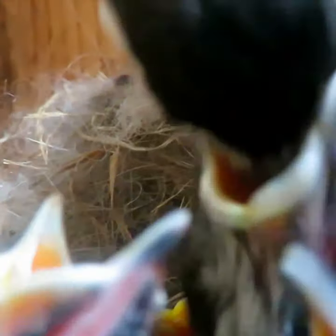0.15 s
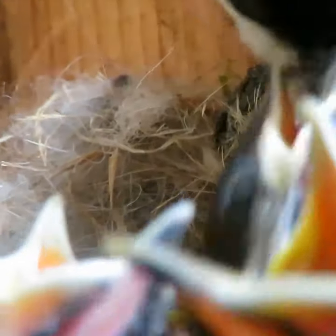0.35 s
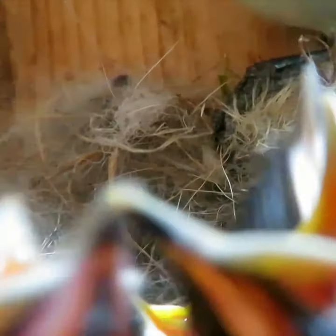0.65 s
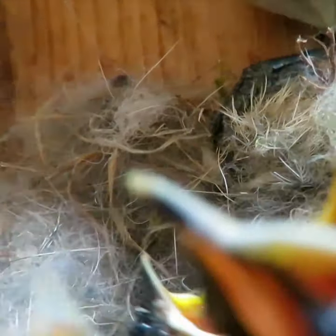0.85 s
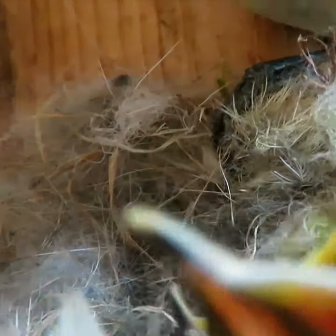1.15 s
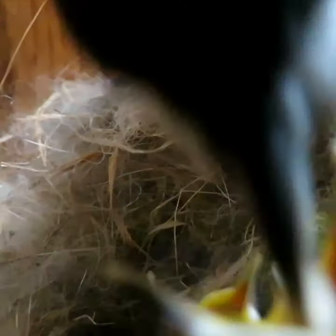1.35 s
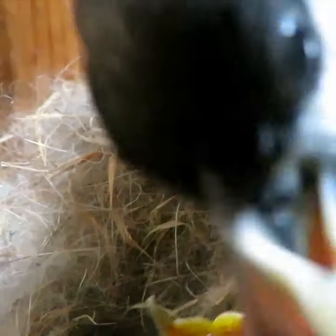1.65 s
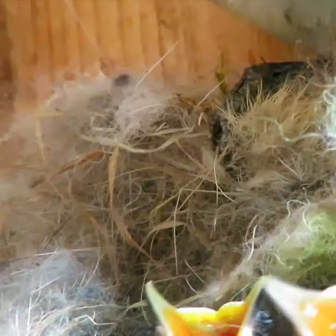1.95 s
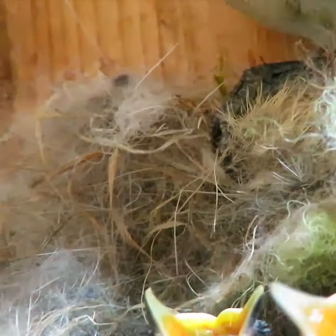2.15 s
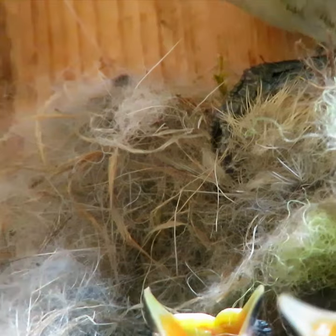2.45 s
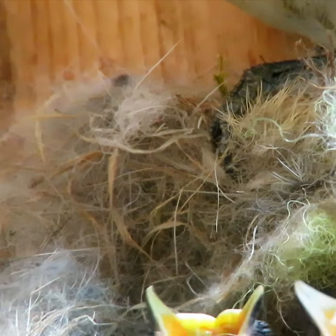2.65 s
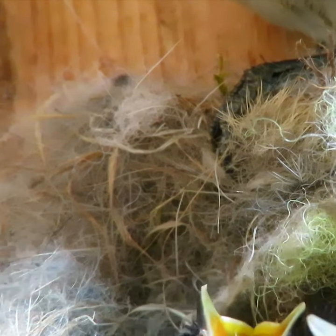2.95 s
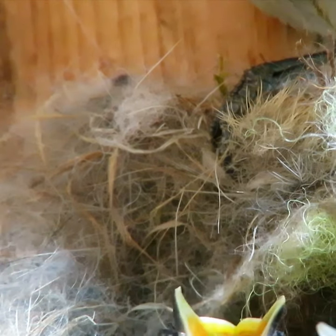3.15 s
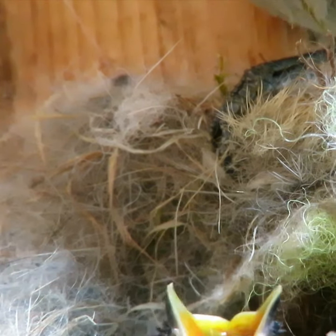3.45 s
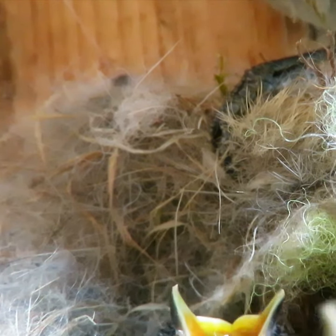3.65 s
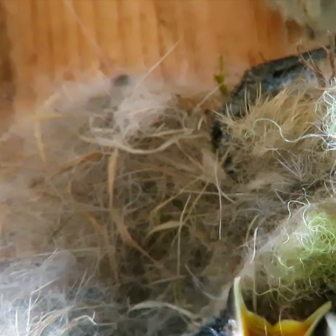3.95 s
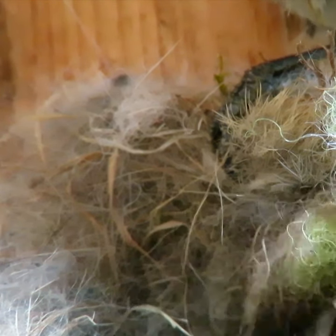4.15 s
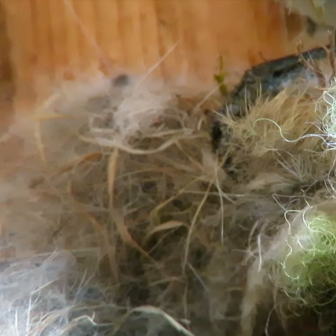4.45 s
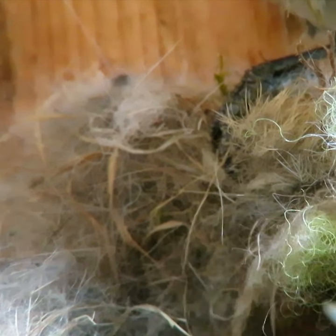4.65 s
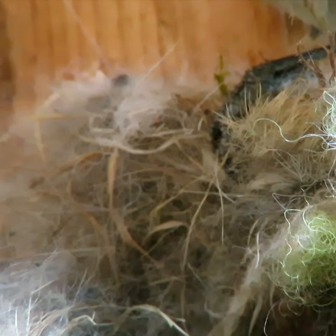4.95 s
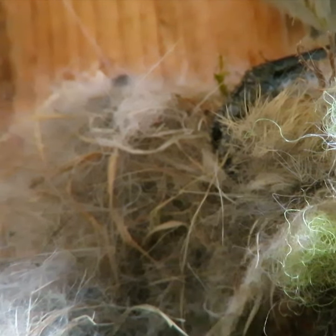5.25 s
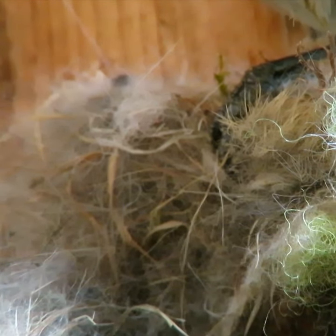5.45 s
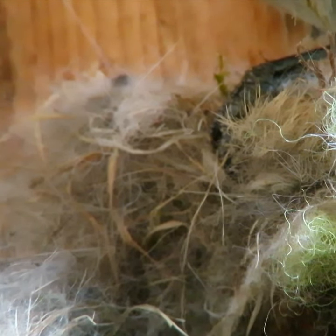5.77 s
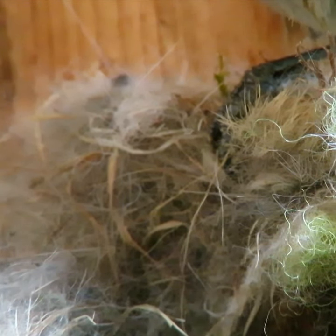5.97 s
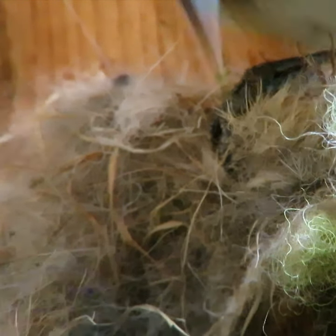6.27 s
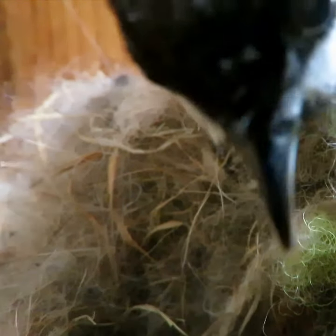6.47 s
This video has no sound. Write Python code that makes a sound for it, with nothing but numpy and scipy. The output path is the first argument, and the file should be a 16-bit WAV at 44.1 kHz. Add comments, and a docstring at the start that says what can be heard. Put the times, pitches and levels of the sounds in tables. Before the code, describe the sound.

Close up in a wooden nest box, baby birds call for food without a break, several throats overlapping in shrill squeals, raspy cheeps and thin sliding whistles. Early on, a parent's foot bumps the wall once, softly. The lower rasping calls grow stronger after that, and the chicks keep going throughout. The box gives the calls a tight, enclosed tone, with faint outdoor rumble, hum and microphone hiss underneath.

```python
"""Outdoor rumble, a faint hum and microphone hiss lie below from start to end.
At once nestlings beg in a small wooden nest box, several throats together: hoarse whistles that swell
and break off, soon joined by thin, clear glides. The box colours the calls, and they reach two close
microphone ports by different paths. At about 1.4 s a parent's foot knocks once on the wood.
The begging goes on to the end, at 6.6 s."""
import sys
import numpy as np
from scipy import signal
from scipy.fft import rfft, irfft, next_fast_len
from scipy.io import wavfile

SR = 44100
rng = np.random.default_rng(int(sys.argv[2]) if len(sys.argv) > 2 else 0)


def to_wav(sig):
    """Store sig (one row per channel, or 1-D mono) as 16-bit WAV at the path in sys.argv[1].

    Samples outside -1..1 are clipped; the rate is SR.
    """
    pcm = np.clip(np.atleast_2d(sig), -1, 1) * 32767
    pcm = np.round(pcm).astype(np.int16)
    wavfile.write(sys.argv[1], SR, pcm.T)  # frames by channels


N = 291501


def amp(db):
    """Turns decibels into a number to multiply by."""
    return 10 ** (np.asarray(db) / 20)


def rms_one(x):
    """Scales a signal so that its average size (rms) is 1."""
    return x / np.sqrt(np.mean(x ** 2) + 1e-20)


def at_hz(points, hz):
    """Reads between the rows of a table, on a log-frequency axis."""
    table = np.array(points, float)
    return np.interp(np.log(hz + 1), np.log(table[:, 0] + 1), table[:, 1])


def drift(rate_hz):
    """A smooth random wander of size 1; a higher rate wanders faster."""
    r = np.exp(-2 * np.pi * rate_hz / SR)
    return rms_one(signal.lfilter([1], [1, -2 * r, r * r], rng.standard_normal(N)))


def shaped(x, response):
    """Multiplies each frequency in x by response(frequency)."""
    size = next_fast_len(N + SR // 4)
    hz = np.arange(size // 2 + 1) * SR / size
    return irfft(rfft(x, size) * response(hz), size)[..., :N]


def ring(push, hz, ring_s):
    """Rings at one pitch when pushed, fading by 60 dB in ring_s seconds."""
    r = amp(-60 / (ring_s * SR))
    return signal.lfilter([1], [1, -2 * r * np.cos(2 * np.pi * hz / SR), r * r], push)


# How strong the rumble's frequencies are against each other: f/Hz, level/dB
RUMBLE_COLOUR = [(15, -41), (25, -12.5), (55, 1), (114, -5), (275, -6.5), (345, 5), (619, -18),
                 (900, -18.5), (1170, -16.5), (1980, -120)]

def rumble(level_db=-41.5, side_db=-15):
    """Low outdoor noise, nearly alike at both microphone ports."""
    mid, side = shaped(rng.standard_normal((2, N)), lambda hz: amp(at_hz(RUMBLE_COLOUR, hz)))
    side = signal.lfilter(*signal.butter(1, 1200, "high", fs=SR), side)
    return amp(level_db) * (rms_one(mid) + amp(side_db) * rms_one(side) * [[1], [-1]])


# The tones of the hum: f/Hz, width/Hz, level/dB
HUM_TONES = [(119.3, 4.5, -50), (236.4, 2.3, -52), (350, 20, -57.5)]

def hum():
    """Narrow bands of noise, heard as low wavering tones."""
    out = np.zeros(N)
    for hz, width_hz, level_db in HUM_TONES:
        ring_s = np.log(1000) / (np.pi * width_hz)
        out += amp(level_db) * rms_one(ring(rng.standard_normal(N), hz, ring_s))
    return out


def hiss(level_db=-60):
    """The microphone's own even noise, separate on each side."""
    return amp(level_db) * rng.standard_normal((2, N))


# How far a squeal sinks (below zero it rises): f/Hz, share of the pitch lost
SQUEAL_SAG = [(3200, -0.0394), (4200, -0.00024), (8500, .015)]

def squeal(start, end, hz, level_db, hoarse, rasp_db, drop=.036):
    """Plans one squeal: the lowest tend to rise, the highest to sink, each a little differently."""
    sag_hz = hz * (at_hz(SQUEAL_SAG, hz) + .012 * rng.standard_normal())
    return start, end, hz + sag_hz / 2, hz - sag_hz / 2, level_db, hoarse, rasp_db, drop, 1


# The squeals that stand out: start t/s, end t/s, f/Hz, level/dB
CLEAR_SQUEALS = [(-0.004, 0.131, 6660, -23), (0.14, 0.35, 6750, -21), (0.453, 0.56, 7250, -27),
                 (0.487, 0.657, 6710, -19.5), (0.687, 0.909, 6950, -26.5), (0.758, 0.945, 7820, -25),
                 (0.94, 1.055, 7150, -22), (1.126, 1.233, 8160, -26), (1.235, 1.37, 6320, -23),
                 (1.454, 1.575, 7400, -25), (1.524, 1.584, 3740, -23), (1.719, 1.892, 6970, -31),
                 (1.866, 1.992, 9000, -25.5), (2.03, 2.065, 3570, -23), (2.04, 2.16, 8740, -22.5),
                 (2.215, 2.365, 8560, -23.5), (2.43, 2.554, 7900, -23.5), (2.592, 2.707, 8400, -21.5),
                 (2.744, 2.937, 7830, -26.5), (2.918, 2.931, 4100, -14.5), (2.975, 3.093, 6650, -22),
                 (3.12, 3.144, 4160, -19.5), (3.169, 3.291, 7580, -22.5), (3.374, 3.507, 7290, -22.5),
                 (3.55, 3.651, 7940, -23), (3.587, 3.634, 3580, -18), (3.656, 3.883, 6740, -20.5),
                 (3.773, 3.804, 3310, -16), (3.863, 3.903, 4020, -17), (3.9, 3.985, 7250, -23),
                 (4.035, 4.115, 7800, -25), (4.143, 4.275, 7350, -22.5), (4.372, 4.46, 6870, -27.5),
                 (4.533, 4.638, 8230, -26.5), (4.676, 4.833, 8800, -31.5), (4.704, 4.803, 6640, -23),
                 (4.887, 4.958, 3200, -21), (4.894, 4.974, 6670, -21), (4.936, 4.996, 4166, -13),
                 (5.056, 5.173, 3146, -23.5), (5.06, 5.193, 5890, -21), (5.105, 5.13, 4055, -14),
                 (5.16, 5.2, 4010, -16), (5.338, 5.41, 3580, -24.5), (5.343, 5.425, 4170, -19.5),
                 (5.47, 5.605, 7300, -30), (5.615, 5.66, 5600, -30), (5.724, 5.858, 7100, -32.5),
                 (5.985, 6.11, 3900, -24), (6.233, 6.296, 4190, -15), (6.357, 6.437, 6260, -25),
                 (6.378, 6.492, 4100, -13), (6.545, 6.626, 7250, -17), (6.588, 6.62, 4150, -16)]
# Higher squeals are rougher: f/Hz, hoarseness from 0 (pure) to 1 (rough)
HOARSENESS = [(3200, 0.1), (3700, 0.33), (7000, 0.42), (9000, 0.65)]

def clear_squeals():
    """Plans the clearest squeals, with more whistle than rushing air."""
    return [squeal(start, end, hz, db, at_hz(HOARSENESS, hz), rasp_db=-6)
            for start, end, hz, db in CLEAR_SQUEALS]


# How hard the chicks beg, as the strength of their rasp: t/s, level/dB
BEGGING_EFFORT = [(0, -23), (1.0, -21.5), (1.3, -18), (3.05, -20.5), (3.25, -20), (4.6, -19.5), (4.9, -20),
                  (5.1, -18.5), (5.22, -26), (6.05, -21.5), (6.25, -20.5), (6.6, -25)]

def effort_db(s):
    """How hard the chicks push air at s seconds."""
    return np.interp(s, *np.transpose(BEGGING_EFFORT))


# Low rasping calls: start t/s, end t/s, f/Hz, whistle level/dB
RASPING_CALLS = [(-0.003, 0.29, 3630, -46), (0.348, 0.585, 3020, -57), (0.656, 0.732, 3210, -38.5),
                 (0.748, 0.931, 3240, -32), (0.98, 1.175, 3390, -37), (1.212, 1.464, 3400, -31),
                 (1.495, 1.686, 3520, -52), (1.705, 1.792, 3750, -74.5), (1.828, 1.974, 3130, -48),
                 (2.027, 2.288, 3650, -31), (2.3, 2.39, 3630, -43.5), (2.404, 2.543, 3570, -24.5),
                 (2.611, 2.73, 3766, -25), (2.792, 2.92, 3320, -23), (2.971, 3.12, 3314, -35.5),
                 (3.168, 3.307, 3725, -28.5), (3.369, 3.492, 3730, -26), (3.565, 3.725, 3720, -28.5),
                 (3.734, 3.896, 3700, -27.5), (3.955, 4.155, 3495, -23.5), (4.169, 4.313, 3810, -36.5),
                 (4.342, 4.521, 3886, -25.5), (4.547, 4.64, 3670, -30), (4.702, 4.815, 3790, -22),
                 (4.884, 4.97, 4060, -20.5), (5.048, 5.138, 4090, -22.5), (5.159, 5.202, 3830, -31),
                 (5.235, 5.302, 3620, -25.5), (5.343, 5.415, 4120, -17.5), (5.572, 5.676, 3780, -34.5),
                 (5.733, 5.876, 3960, -30.5), (5.958, 6.109, 3630, -35), (6.16, 6.311, 3524, -21.5),
                 (6.327, 6.492, 3374, -22.5), (6.53, 6.64, 3600, -18.5)]

def rasps(hoarse=.55, drop=.35):
    """Plans the low calls: mostly rushing air, with a whistle that falls steeply as it ends."""
    return [(start, end, hz, hz, db, hoarse, effort_db((start + end) / 2) - db, drop, 1)
            for start, end, hz, db in RASPING_CALLS]


# When the chicks deeper in the nest pause: start t/s, end t/s
PAUSES = [(0.268, 0.345), (0.577, 0.65), (0.92, 0.978), (1.162, 1.212), (1.975, 2.025), (3.143, 3.172),
          (5.93, 5.957)]

def faint_squeals(every_s=.1, length_s=.2, low_hz=3276, high_hz=8150):
    """Plans the quieter squeals from deeper in the nest, at random times and pitches."""
    plans = []
    for s in np.arange(0, N / SR, every_s):
        start = s + rng.random() * every_s - length_s / 2
        end = start + length_s
        hz = rng.uniform(low_hz, high_hz)
        for hush, resume in PAUSES:
            if start < resume and end > hush:
                start, end = (start, hush) if start < hush else (resume, end)
        plans.append(squeal(start, end, hz, effort_db(s) - 8, hoarse=.447, rasp_db=-1.5))
    return plans


# Thin whistles and short falling squeaks: start t/s, end t/s, first f/Hz, last f/Hz, level/dB
GLIDING_CALLS = [(0.12, 0.152, 5800, 5450, -21), (0.243, 0.264, 4300, 2100, -27),
                 (1.142, 1.16, 4400, 2300, -26), (0.31, 0.368, 3340, 2830, -31),
                 (0.362, 0.486, 6650, 7080, -26), (0.689, 0.725, 3480, 2800, -29),
                 (0.7, 0.796, 6800, 7030, -31), (0.935, 0.962, 5800, 5300, -30),
                 (1.046, 1.144, 6930, 6850, -25.5), (1.627, 1.69, 6960, 6900, -30),
                 (1.752, 1.96, 5900, 5800, -26), (2.048, 2.143, 6690, 6660, -29),
                 (2.38, 2.44, 6600, 6800, -26), (2.85, 2.92, 6620, 6650, -21),
                 (2.877, 2.933, 5950, 4860, -23), (3.087, 3.138, 6500, 5040, -24),
                 (4.04, 4.147, 3800, 4250, -21), (4.625, 4.657, 5940, 4250, -22),
                 (4.83, 4.875, 3400, 2950, -33), (5.258, 5.287, 5950, 5600, -21),
                 (5.297, 5.348, 5450, 5330, -16), (6.06, 6.115, 6800, 6350, -25),
                 (6.088, 6.128, 3430, 2550, -22), (6.188, 6.246, 6650, 6540, -23),
                 (6.211, 6.303, 2965, 3360, -21), (6.22, 6.3, 5850, 6650, -26),
                 (6.3, 6.323, 3300, 2300, -25)]

def glides(hoarse=.1, rasp_db=-25, drop=0, bend=1.8):
    """Plans nearly pure whistles; a bend above 1 makes the pitch slide faster towards the end."""
    return [(*glide, hoarse, rasp_db, drop, bend) for glide in GLIDING_CALLS]


def throat():
    """The random unsteadiness of one throat, and the air that rushes through it."""
    beat_hz = 850 + 150 * drift(15)   # a second membrane vibrates too
    beat = np.sqrt(2) * np.sin(2 * np.pi * np.cumsum(beat_hz) / SR)
    chatter = rms_one(signal.lfilter(*signal.butter(2, 600, fs=SR), rng.standard_normal(N)))
    air = rms_one(rng.standard_normal(N) * amp(2 * drift(220)))   # the air tears in lumps
    treble = signal.sosfilt(signal.butter(4, 5400, "high", fs=SR, output="sos"), air)
    bright_air = treble + amp(.5) * air
    wobble, flutter, surge = drift(71.3), drift(71.3), drift(16.6)
    return wobble, flutter, surge, beat, chatter, air, bright_air


def nestlings(plans):
    """Plays each planned call as an unsteady whistle over rushing air, at one of three nest places."""
    edge_s, drop_s = .002, .005
    swell_db, flutter_db, surge_db, octave_db = 2, .5, 3.5, -25
    throats = [throat() for _ in range(4)]
    places = np.zeros((3, N))
    for k, (start, end, first_hz, last_hz, level_db, hoarse, rasp_db, drop, bend) in enumerate(plans):
        span = slice(max(int((start - .04) * SR), 0), min(int((end + .03) * SR), N))
        t = np.arange(span.start, span.stop) / SR
        wobble, flutter, surge, beat, chatter, air, bright_air = (part[span] for part in throats[k % 4])
        is_low = first_hz < 5000
        progress = np.clip((t - start) / (end - start), 0, 1)
        on_off = 1 / (1 + np.exp((start - t) / edge_s)) / (1 + np.exp((t - end) / edge_s))
        loudness = on_off * amp(level_db + swell_db * (progress - 1) + flutter_db * flutter)
        giving_out = np.exp(np.minimum(t - end, 0) / drop_s)   # at the end, pitch sags and air escapes
        glide_hz = first_hz + (last_hz - first_hz) * progress ** bend
        pitch_hz = glide_hz * (1 - drop * giving_out) + (30 + 201.5 * hoarse) * wobble
        phase = 2 * np.pi * np.cumsum(pitch_hz) / SR
        octave = amp(octave_db) * np.sin(2 * phase) * (first_hz < SR / 6)
        beat_share = .6 if is_low else 0
        shake = np.sqrt(beat_share) * beat + np.sqrt(1 - beat_share) * chatter
        roughness = np.sqrt(1 - hoarse) + np.sqrt(hoarse) * shake   # fast shaking sounds hoarse
        surging = amp(surge_db * surge * hoarse ** .5)   # the whistle comes and goes
        whistle = np.sqrt(2) * roughness * surging * (np.sin(phase) + octave)
        rasp = amp(rasp_db) * (1 + .4 * giving_out) * (air if is_low else bright_air)
        places[k % 3, span] += loudness * (whistle + rasp)
    return places


# How box and microphone lift or weaken each frequency: f/Hz, level/dB
BOX_TONE = [(700, -24.5), (1000, -10.5), (1290, 1), (1500, -11), (2700, -13), (3300, -6), (4150, -5.5),
            (4700, -12), (6000, -7.5), (8000, -1), (9500, -14.5), (11000, -17), (12500, -20.5),
            (15000, -30)]
# Pitches at which the air in the box rings: f/Hz, width/Hz, added level/dB
STANDING_WAVES = [(3236, 37, 6.5), (4910, 180, 6.5), (5990, 71, 7), (8360, 210, 1.5)]

def box_colour(hz):
    """The gain at each frequency: a broad shape, with peaks where waves fit between the walls."""
    peaks_db = sum(db / (1 + (2 * (hz - peak_hz) / width_hz) ** 2)
                   for peak_hz, width_hz, db in STANDING_WAVES)
    return amp(at_hz(BOX_TONE, hz) + peaks_db)


# How far the wave at the left port is ahead of the right: f/Hz, phase/rad
LEFT_LEAD = [(0, 0), (4050, -0.2), (4310, 0.3), (4820, 6.6), (5170, 3.8), (5510, -0.4), (7240, -0.1),
             (7490, 2.4), (8010, 1.8), (8350, 4.1), (9130, 4.0), (9990, 10.1), (11400, 9.4), (14600, 9.4)]
# Extra head start of the left port, for each place in the nest: t/s
PLACE_LEADS = [-0.0000053, 0, 18e-6]

def nest_box(places, echo_db=-8, echo_s=.02, tilt_db=.1):
    """The calls reach the two ports by different paths and bounce briefly off the walls."""
    voices = shaped(places, box_colour)
    half_turn = np.array([[.5j], [-.5j]])   # half the lead goes to each port, in opposite directions
    t = np.arange(int(echo_s * SR)) / SR
    treble = signal.butter(2, 3400, "high", fs=SR)   # long waves fill the small box evenly
    out = np.zeros((2, N))
    for voice, lead_s in zip(voices, PLACE_LEADS):
        out += shaped(voice, lambda hz: np.exp(half_turn * (at_hz(LEFT_LEAD, hz) + 2*np.pi*hz*lead_s)))
        echo = signal.lfilter(*treble, rng.standard_normal((2, len(t)))) * amp(-60 * t / echo_s)
        echo = rms_one(echo) / np.sqrt(len(t))
        out += amp(echo_db) * signal.fftconvolve(voice[None], echo, axes=1)[:, :N]
    return out * amp([[-tilt_db], [tilt_db]])


# The push of the parent's foot, before the wood rings: t/s, level/dB
FOOT_PUSH = [(1.355, -44.5)]
# The low note of the wooden wall: f/Hz, t/s to fade by 60 dB
WALL_NOTE = [(130, 0.016)]

def knock():
    """A soft push from a foot sets the wooden wall ringing."""
    push = np.zeros(N)
    for s, level_db in FOOT_PUSH:
        push[int(s * SR)] = -amp(level_db)
    soft_push = signal.lfilter(*signal.butter(1, [80, 300], "band", fs=SR), push + 1e-18)
    return sum(ring(soft_push, hz, ring_s) for hz, ring_s in WALL_NOTE)


def scene():
    """The steady background, the begging in the box and one knock."""
    background = rumble() + hum() + hiss()
    plans = rasps() + glides() + clear_squeals() + faint_squeals()
    return background + nest_box(nestlings(plans)) + knock()


def record(dry, cutoff_hz=15400):
    """Cuts away the very highest treble."""
    return signal.sosfilt(signal.cheby2(20, 70, cutoff_hz, fs=SR, output="sos"), dry)


dry = scene()
out = record(dry)
to_wav(out)
```